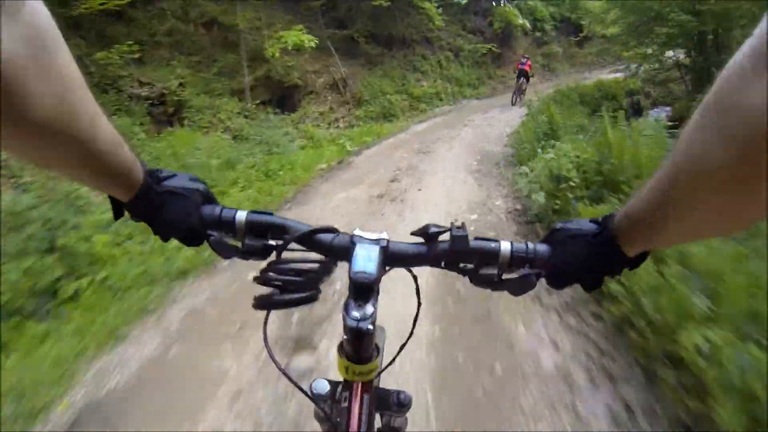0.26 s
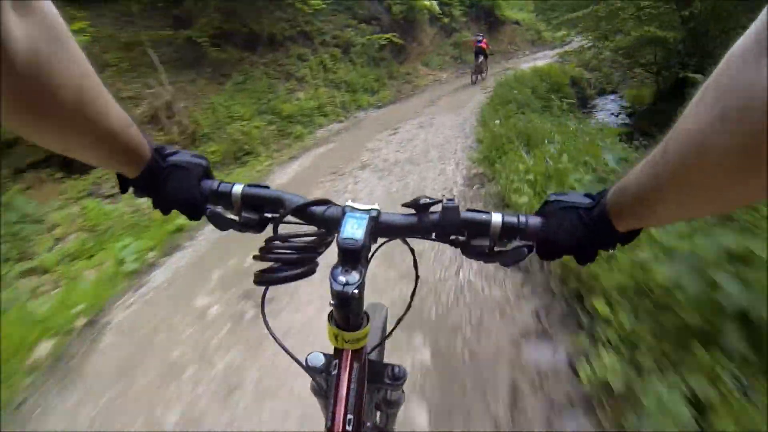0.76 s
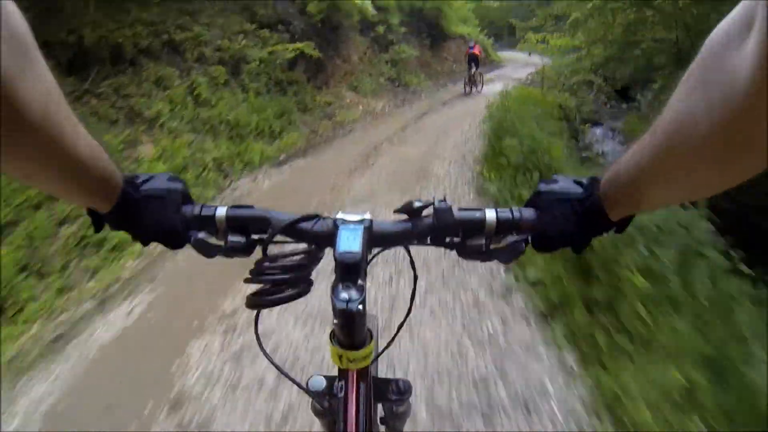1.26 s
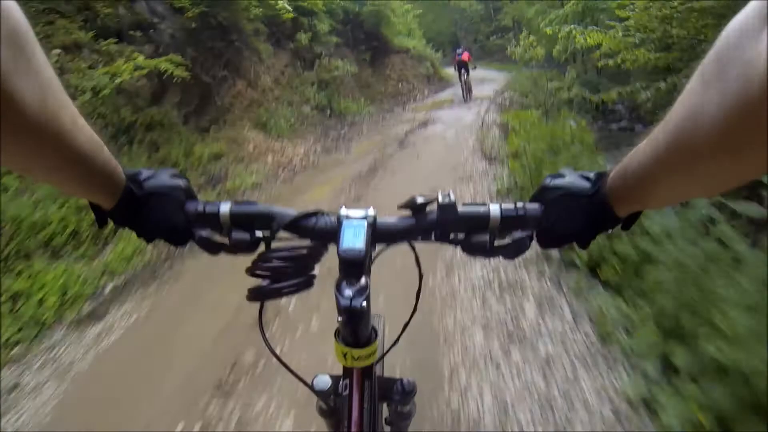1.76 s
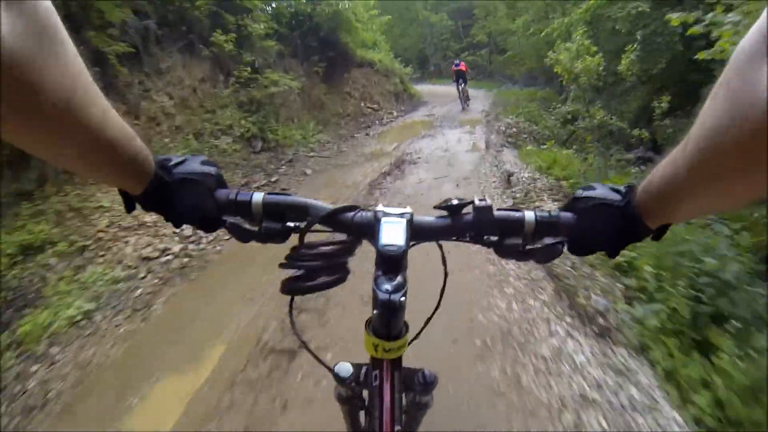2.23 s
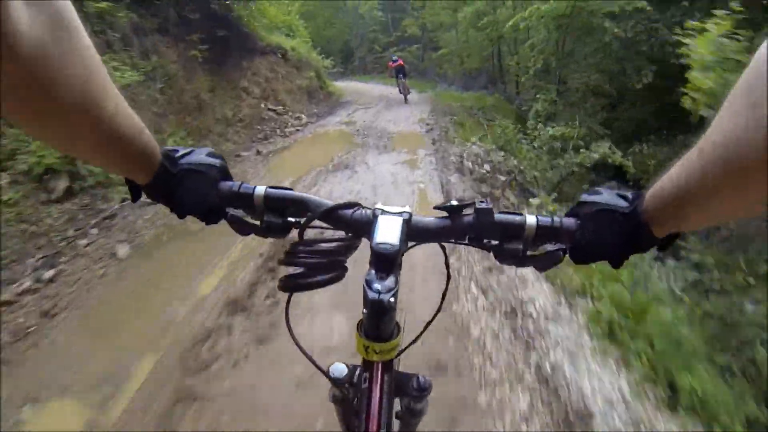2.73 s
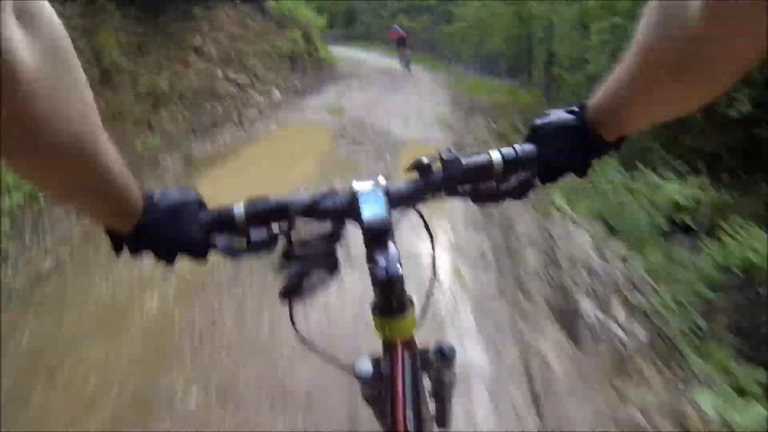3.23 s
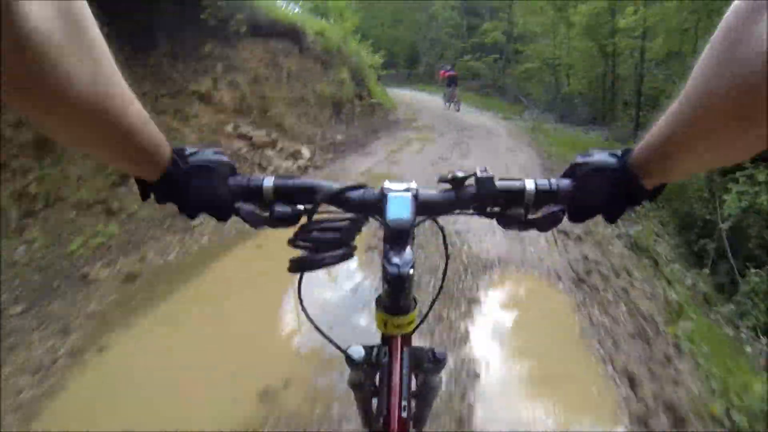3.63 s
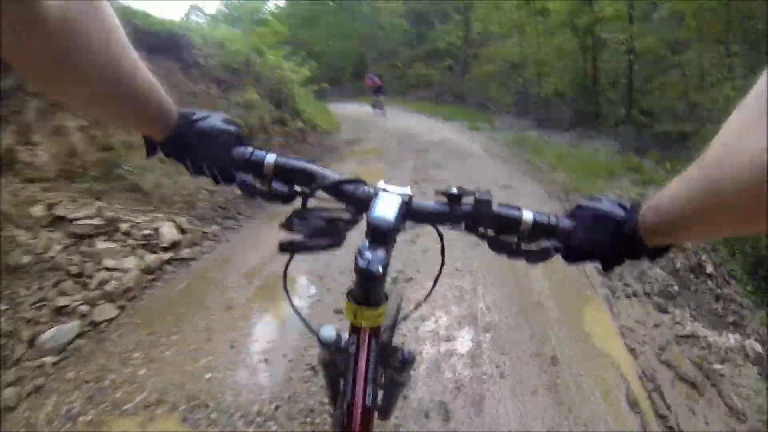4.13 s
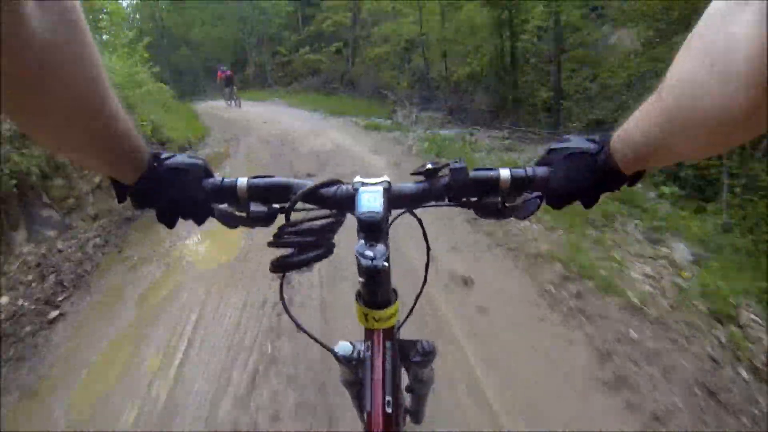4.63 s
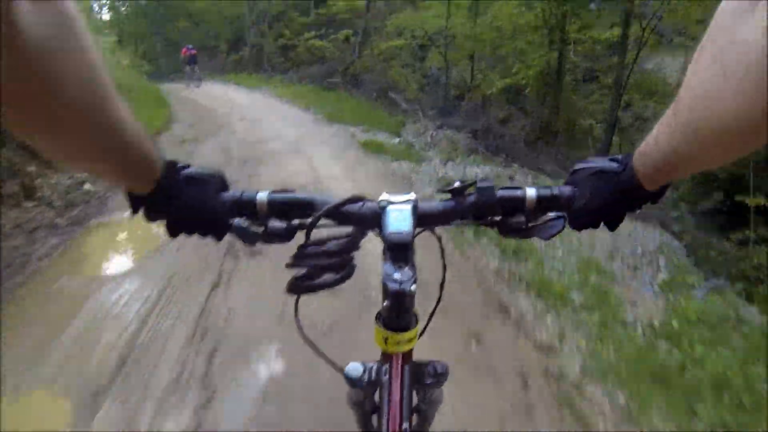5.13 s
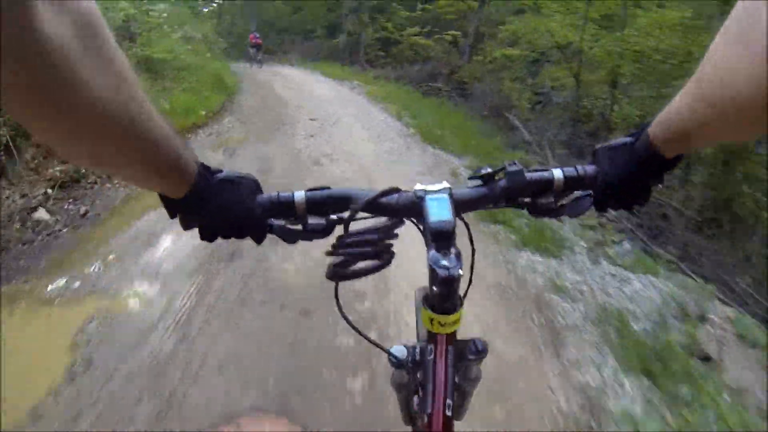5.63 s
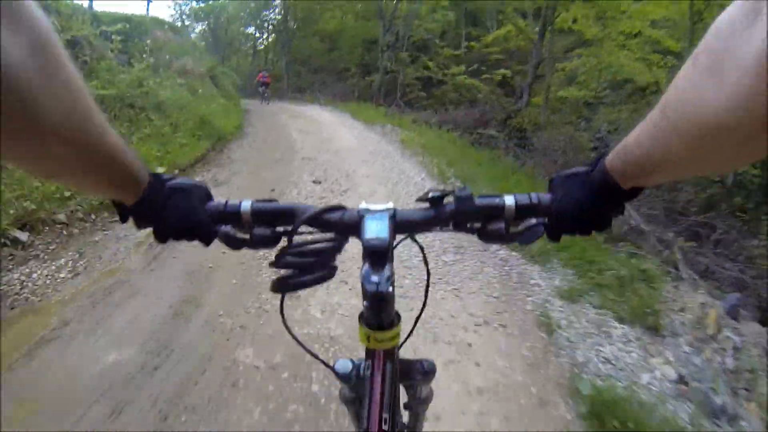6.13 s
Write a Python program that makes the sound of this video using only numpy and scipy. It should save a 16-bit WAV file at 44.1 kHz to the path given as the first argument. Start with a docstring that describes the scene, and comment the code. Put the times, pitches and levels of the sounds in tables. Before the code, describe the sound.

Deep wind buffets the microphone as bicycle tyres crunch down a gravel road, flung stones clicking on the frame, gradually easing.

```python
"""Wind rumbles and tyres crunch and hiss as a bicycle rolls down a gravel road.
Flung stones click on the frame, the chain chinks and the tread whirrs on smoother ground.
The wind eases as the bicycle slows. All is heard by a camera in a plastic housing on the rider's
chest: swirls of air thump the housing, and its ringing colours the gravel, stones and chain."""
import sys
import numpy as np
from scipy import signal
from scipy.fft import rfft, irfft
from scipy.io import wavfile
from scipy.ndimage import uniform_filter1d

SR = 44100
rng = np.random.default_rng(int(sys.argv[2]) if len(sys.argv) > 2 else 0)


def persist_wave(psi):
    """Save psi, clipped to +-1, as 16-bit WAV."""
    counts = np.round(np.clip(psi, -1, 1) * 32767).astype(np.int16)
    wavfile.write(sys.argv[1], SR, np.atleast_2d(counts).T)


N = 281358

# How the housing colours crunch and stones, ringing near 1 and 2 kHz: (frequency [Hz], gain [dB])
HOUSING_MIDDLE = [(180, -39), (300, -6.5), (420, -7), (718, -7), (965, -1.5), (1340, -5.5), (1660, -3),
                  (1990, -3), (2680, -15.5), (3050, -16.5), (4150, -36), (6000, -41), (15400, -61)]
# How the housing colours the high sounds of grit and chain: (frequency [Hz], gain [dB])
HOUSING_HIGHS = [(2400, -14), (3400, 4), (4150, -5), (5050, 0), (5800, -10), (7150, -20), (7900, -17),
                 (8500, -10), (9800, -17), (10600, -15), (11900, -21), (12400, -27), (13100, -23),
                 (13900, -26), (14700, -23), (15400, -27)]


def wind():
    """Swirls of air push on the housing, making a deep, lumpy rumble and a quicker flutter."""
    # Strength of the passing air: (time [s], rumble level [dB], flutter level [dB])
    strength = [(0, -24.5, -21.5), (0.1, -19, -22), (0.25, -18, -19), (0.5, -20, -22), (0.9, -14, -15),
                (1.02, -19.5, -24), (1.25, -19, -15), (1.5, -26.5, -28.5), (2.3, -30.5, -32.5),
                (2.7, -22, -27), (3.3, -33, -33), (3.5, -29, -35.5), (4.0, -33, -36), (4.2, -41, -36.5),
                (4.4, -32, -37.5), (4.75, -33.5, -36.5), (4.95, -37.5, -41.5), (5.7, -37.5, -44),
                (6.2, -44, -40.5), (6.38, -33.5, -43)]
    # Tone of each of the two noises: (frequency [Hz], gain [dB])
    rumble_tone = [(9, -24), (15, -1.5), (40, 4), (62, 1), (85, -1.5), (120, -17.5), (250, -75),
                   (2000, -140)]
    flutter_tone = [(50, -5), (85, 0.5), (125, 1.5), (165, -5), (205, -5), (300, -11.5), (450, -18.5),
                    (700, -26), (1500, -78), (5000, -140)]
    # Single swirls that thump the housing: (time [s], rumble change [dB], flutter change [dB])
    thumps = [(0.03, 11, 4), (0.06, 5, 3.5), (0.362, 15, 8), (0.72, 4.5, 0), (0.96, -2, -2), (1.11, 0, 8.5),
              (1.19, 7.5, 2.5), (1.31, 9.5, -5.5), (1.4, 7, -6.5), (1.52, 7, -1), (1.78, 3, 5.5),
              (1.99, 11.5, 10), (2.15, 9, -2), (2.28, 4, 0), (2.43, 0, 7), (2.52, 4.5, -2.5), (2.75, 5, 3),
              (2.83, -0.5, -5), (3.08, 6, 4), (3.3, 12, 3), (3.39, 10.5, -1), (3.8, 6.5, -4), (4.0, 8, -1),
              (4.34, 8, -2), (4.67, 3.5, -2), (5.13, 6.5, 8.5), (5.26, 14.5, 5), (5.61, 7.5, 8.5),
              (5.9, 5, 1), (6.02, 9, -6)]
    rumble_db, flutter_db = curves(strength)
    times, thump_db, flap_db = np.transpose(thumps)
    half_thump_s = 0.028
    buffeting_db = 2.5 * wobble(top_hz=2.7)
    rumble_db += buffeting_db + swells(times, half_thump_s, thump_db)
    flutter_db += 0.72 * buffeting_db + swells(times, half_thump_s, flap_db)
    rumble = steady_noise(rumble_tone, steadiness=0.5)
    flutter = steady_noise(flutter_tone, steadiness=0.11)
    flutter = unit_level(flutter * amp(0.75 * wobble(top_hz=30)))
    return amp(rumble_db) * rumble + amp(flutter_db) * flutter


def tyres():
    """Crunch, hiss and a higher fizz swell together as the tread meets clumps of gravel."""
    # Tyres on the road: (time [s], crunch level [dB], hiss and fizz [each in dB relative to crunch])
    levels = [(0, -30.5, -24.5, -34), (0.4, -28, -26, -35.5), (1.1, -26.5, -24, -39.5),
              (1.4, -25.5, -23, -31), (1.65, -26, -23, -30.5), (1.9, -29.5, -22, -30),
              (2.25, -30, -21.5, -32), (2.6, -32, -20, -31), (3.2, -32, -18.5, -32),
              (3.45, -32, -14, -27.5), (3.9, -32, -17, -29.5), (4.1, -23.5, -23.5, -27.5),
              (4.3, -29, -17, -28), (4.65, -34.5, -14, -25.5), (5.2, -39.5, -16.5, -25.5),
              (6.38, -39.5, -17.5, -33.5)]
    # Patches of loose gravel: (time [s], half length [s], change in crunch, hiss and fizz [each in dB])
    scuffs = [(0.14, 0.041, 5, 12.5, 9), (0.283, 0.043, 3, 7.5, 6), (0.82, 0.0073, -5, 11, -4),
              (1.148, 0.019, 3.5, 7.5, 6), (1.225, 0.017, 9.5, 5, 5), (1.286, 0.0096, 5, 9, 1),
              (1.353, 0.018, 2, 5, 5), (1.447, 0.023, 6.5, 7, 11), (1.489, 0.017, 6, 10, 7),
              (1.604, 0.011, 4.5, 11.5, 9), (1.656, 0.035, 3, 2, 2), (2.942, 0.018, 2, 9, 0),
              (3.812, 0.018, 6, 4, 0), (3.943, .025, 8, 5, 6), (4.028, 0.021, 7.5, 9, 9),
              (4.092, 0.013, 0, 7, 0), (4.204, 0.019, 8, 5, 5), (4.38, .04, 3, 2, 1),
              (4.436, 0.013, 1, 1, 5), (5.127, 0.028, 6.5, 2, 0), (5.525, 0.011, 7.5, 2, 2)]
    crunch_db, hiss_db, fizz_db = curves(levels)
    times, half_s, *changes_db = np.transpose(scuffs)
    crunch_swell, hiss_swell, fizz_swell = [amp(swells(times, half_s, db)) for db in changes_db]
    clumps = wobble(top_hz=27.6)
    hiss = hiss_swell * amp(hiss_db) * grit(clumps, "low")
    fizz = fizz_swell * amp(fizz_db) * grit(clumps, "high")
    return amp(crunch_db) * (crunch_swell * crunch(clumps) + hiss + fizz)


def crunch(clumps):
    """Gravel cracks under the tread, dull or sharp by the size of the stone, over a rolling noise."""
    t = np.arange(256) / SR
    cracks = np.zeros(N)
    for hz in np.geomspace(600, 3200, 6):
        crack = np.exp(-t * hz / 1.2) * np.sin(2 * np.pi * hz * t)
        cracks += unit_level(signal.oaconvolve(clicks(per_s=140, spread_db=3.5), crack)[:N])
    roll = rng.standard_normal(N) * amp(2.0 * clumps)
    return unit_level(housing(0.097 * cracks * amp(0.5 * clumps) + roll, HOUSING_MIDDLE))


def grit(clumps, side):
    """Fine grit makes tiny ticks in flickering noise: the "low" side is hiss, the "high" side fizz."""
    ticks = 0.48 * clicks(per_s=1500, spread_db=6.0) + 0.74 * rng.standard_normal(N)
    flicker_db = 0.42 * clumps + 1.24 * wobble(top_hz=60)
    divider = signal.butter(6, 7100, side, fs=SR, output="sos")  # keeps one side of 7100 Hz
    band = signal.sosfilt(divider, housing(ticks, HOUSING_HIGHS))
    return unit_level(band * amp(flicker_db))


def stones():
    """Each flung stone rings briefly through the housing, with a hard tick and the frame's dull knock."""
    # Stones hitting the frame: (time [s], peak level [dB], pitch [Hz], tick [dB relative to the ring])
    strikes = [(0.111, -8, 1930, -20), (0.118, -17, 940, -18), (0.128, -17, 1860, -24),
               (0.139, -17, 1720, -23), (0.262, -11, 1630, -16.5), (0.317, -14, 1840, -26),
               (0.395, -19, 1230, -23), (0.41, -15, 1100, -20), (0.498, -13.5, 790, -9),
               (0.608, -8, 1030, -24), (0.723, -8.5, 1080, -22), (0.847, -8, 1330, -14),
               (0.864, -9, 2020, -15), (0.954, -10.5, 2000, -15), (0.964, -8, 2100, -24),
               (1.079, -11, 1960, -22), (1.153, -8.5, 2150, -30), (1.162, -5.5, 1930, -26),
               (1.207, -7.5, 1880, -16), (1.226, -6.5, 1740, -19), (1.315, -3, 1880, -18),
               (1.337, -15, 1670, -20), (1.396, -10, 1790, -21), (1.434, -2, 1850, -38),
               (1.441, -5, 865, -28), (1.454, -14, 1480, -28), (1.462, -13, 1510, -30),
               (1.49, -9, 1550, -15), (1.496, -11, 1630, -30), (1.515, -4.5, 1550, -26),
               (1.537, -12, 1740, -22), (1.59, -11, 1420, -18), (1.598, -8, 1160, -26),
               (1.647, -8.5, 1260, -25), (1.653, -12, 1220, -30), (1.659, -7.5, 1720, -31),
               (1.711, -7, 1620, -37), (1.79, -12.5, 1080, -31), (1.853, -12.5, 1020, -26),
               (2.825, -3.5, 2020, -19.5), (3.074, -14, 800, -24), (3.324, -16.5, 1910, -11),
               (3.383, -17, 990, -10), (3.471, -17.5, 760, -12), (3.586, -18, 1010, -2),
               (3.777, -13, 1900, -22), (3.923, -14, 2020, -13), (3.933, -15, 1780, -5),
               (3.982, -10.5, 905, -11), (3.985, -7, 2020, -20), (4.013, -7, 1710, -16),
               (4.021, -5, 1720, -13), (4.03, -3, 2080, -32), (4.036, -2, 2140, -26), (4.04, -8, 2000, -22),
               (4.063, -12, 1700, -22), (4.073, -9.5, 920, -16), (4.081, -1.5, 1830, -30),
               (4.09, -6, 1750, -15), (4.103, -10, 1910, -26), (4.17, -11.5, 1960, -26),
               (4.19, -6.5, 1800, -23), (4.207, -16, 1700, -24), (4.22, -6.5, 1950, -18),
               (4.254, -13, 1130, -11), (4.283, -16, 1590, -14), (4.343, -16, 2060, -20),
               (4.369, -9, 1920, -20), (4.386, -15.5, 1120, -18), (4.642, -17, 1930, -25),
               (5.122, -19, 1490, -22), (5.505, -24, 970, -14), (5.522, -14, 1670, -19),
               (6.082, -20, 680, -19), (6.271, -22.5, 990, -1), (6.312, -25, 1910, -29),
               (6.356, -13.5, 1950, -20)]
    out, t = np.zeros(N + 1024), np.arange(1024) / SR
    ring_cycles = 0.99  # the ring fades to about a third in this many cycles
    rise = 1 - np.exp(-(t / 0.00026) ** 2)  # the contact builds up over half a millisecond
    tick_tones = np.sin(2 * np.pi * 3100 * t) + 0.24 * np.sin(2 * np.pi * 5050 * t)
    tick = unit_peak(rise * np.exp(-t / 0.0019) * tick_tones)
    knock = rise * np.exp(-t / 0.00076) * np.sin(2 * np.pi * 680 * t)
    for time_s, peak_db, hz, tick_db in strikes:
        ring = rise * np.exp(-t * hz / ring_cycles) * np.sin(2 * np.pi * hz * t)
        ring = unit_peak(housing(ring, HOUSING_MIDDLE))
        hit = ring + amp(tick_db) * tick + 0.7 * knock
        start = round(time_s * SR)
        out[start:start + len(t)] -= amp(peak_db) * unit_peak(hit)
    return out[:N]


def whirr():
    """The tread whirrs on smoother ground: two narrow bands of noise that waver a little in level."""
    # How the whirr comes and goes: (time [s], level [dB])
    levels = [(0, -63), (2.5, -68), (3.4, -35.5), (4.7, -36), (5.3, -50), (5.9, -45), (6.38, -65)]
    hz = np.fft.rfftfreq(N, 1 / SR)
    main_band = 1 / (1 + ((hz - 1900) / 220) ** 2)
    upper_band = amp(-15) / (1 + ((hz - 3350) / 260) ** 2)
    bands = shaped_noise(main_band + upper_band)
    return amp(curves(levels)[0] + 0.56 * wobble(top_hz=6)) * bands


def chain():
    """The chain slaps: each thin chink is a tiny burst of noise that rings in the housing."""
    # Slaps of the chain: (time [s], peak level [dB])
    slaps = [(0.822, -50), (1.2255, -36), (1.2466, -38), (1.281, -33.5), (1.3433, -33), (1.489, -29),
             (1.5948, -34), (4.433, -36), (4.6994, -42)]
    out, t = np.zeros(N + 1024), np.arange(1024) / SR
    rise_and_fade = (1 - np.exp(-t / 0.00043)) * np.exp(-t / 0.0012)
    for time_s, peak_db in slaps:
        burst = rng.standard_normal(len(t)) * rise_and_fade
        bright = np.diff(burst, 2, prepend=[0, 0])  # weakens the lows and lifts the highs
        start = round(time_s * SR)
        out[start:start + len(t)] += amp(peak_db) * unit_peak(housing(bright, HOUSING_HIGHS))
    return out[:N]


def housing(x, tone):
    """The plastic housing colours a sound, ringing after each hit and never before (minimum phase)."""
    hz = abs(np.fft.fftfreq(4096, 1 / SR))
    log_gain = np.log(gain_at(tone, hz))
    response = np.exp(np.conj(signal.hilbert(log_gain)))
    ring = np.fft.ifft(response).real[:2048]
    return signal.oaconvolve(x, ring)[:len(x)]


def amp(db):
    """Turns decibels into a number to multiply by."""
    return 10 ** (np.asarray(db) / 20)


def unit_level(x):
    """Scales a signal so that its average level (rms) is 1."""
    return x / np.sqrt(np.mean(x ** 2) + 1e-20)


def unit_peak(x):
    """Scales a signal so that its biggest peak is 1."""
    return x / abs(x).max()


def gain_at(tone, hz):
    """Looks up the gain at each frequency, joining the table's points along a pitch scale."""
    points_hz, db = np.transpose(tone)
    return amp(np.interp(np.log(hz + 1), np.log(points_hz + 1), db))


def curves(rows):
    """Joins timed points with straight lines, giving each column one value per sample."""
    times, *columns = np.transpose(rows)
    return [np.interp(np.arange(N) / SR, times, column) for column in columns]


def swells(times, half_s, db):
    """Smooth, bell-shaped rises or dips in level, added up, in dB for each sample."""
    t = np.arange(0, N / SR + 0.002, 0.001)
    bells = db * np.exp(-((t[:, None] - times) / half_s) ** 2)
    return np.interp(np.arange(N) / SR, t, bells.sum(axis=1))


def shaped_noise(gains):
    """Noise with each frequency turned up or down by its gain, at an average level of 1."""
    return unit_level(irfft(rfft(rng.standard_normal(N)) * gains, N))


def steady_noise(tone, steadiness):
    """Noise of a given tone with its chance swings in level partly evened out (0 leaves them alone)."""
    noise = shaped_noise(gain_at(tone, np.fft.rfftfreq(N, 1 / SR)))
    swing = np.sqrt(abs(uniform_filter1d(noise ** 2, 2200)) + 0.01)  # level over about 50 ms
    return unit_level(noise / swing ** steadiness)


def wobble(top_hz):
    """A random drift up and down, mostly slower than top_hz."""
    return shaped_noise(1 / (1 + (np.fft.rfftfreq(N, 1 / SR) / top_hz) ** 2))


def clicks(per_s, spread_db):
    """Clicks at random moments: most are small, a few are large."""
    size = amp(spread_db * np.minimum(rng.exponential(1, N), 4))
    sign = rng.choice([-1., 1.], N)
    return unit_level(size * sign * (rng.random(N) < per_s / SR))


def scene():
    """All the sounds in one channel, with the faint, steady hiss of the microphone."""
    microphone_hiss = amp(-67) * rng.standard_normal(N)
    return (wind() + tyres() + whirr() + stones() + chain() + microphone_hiss)[None]


def record(dry):
    """Gently squashes the loudest peaks, then cuts off the very highest treble."""
    ceiling, top_hz = amp(-1.3), 15270
    softened = dry / (1 + (abs(dry) / ceiling) ** 6) ** (1 / 6)
    treble_cut = signal.firwin(1535, top_hz, window=("kaiser", 9), fs=SR)
    return signal.oaconvolve(softened, treble_cut[None], "same")


dry = scene()
out = record(dry)
persist_wave(out)
```